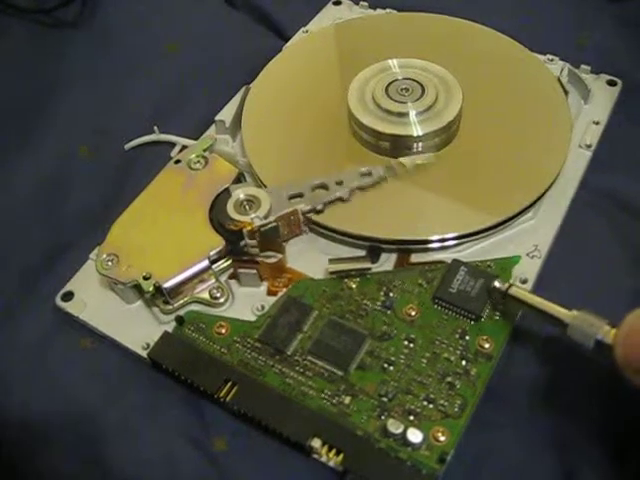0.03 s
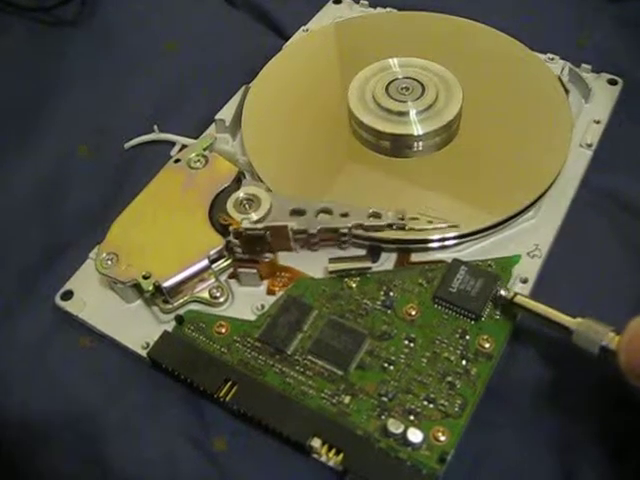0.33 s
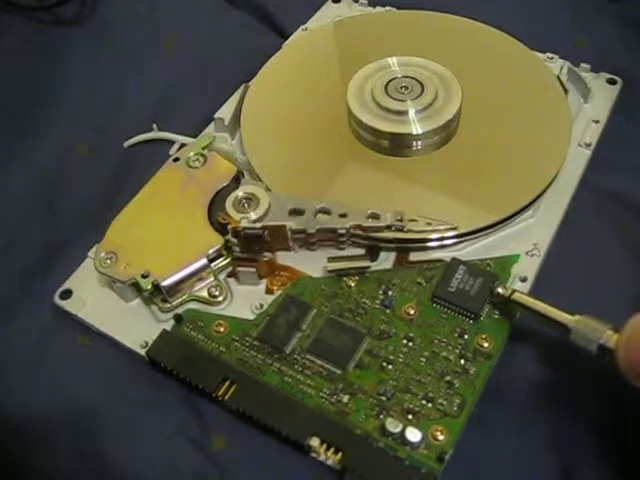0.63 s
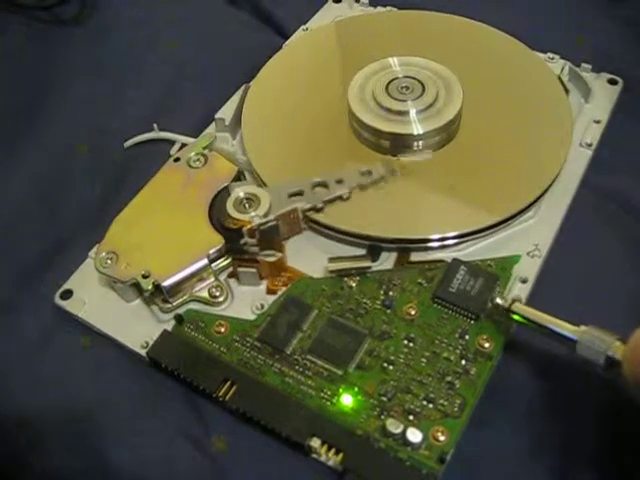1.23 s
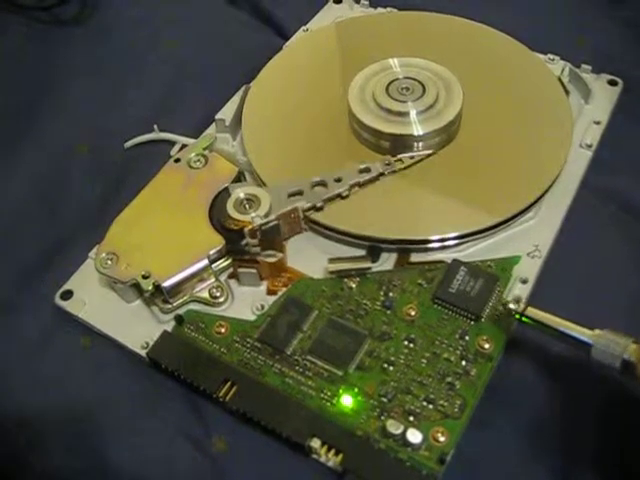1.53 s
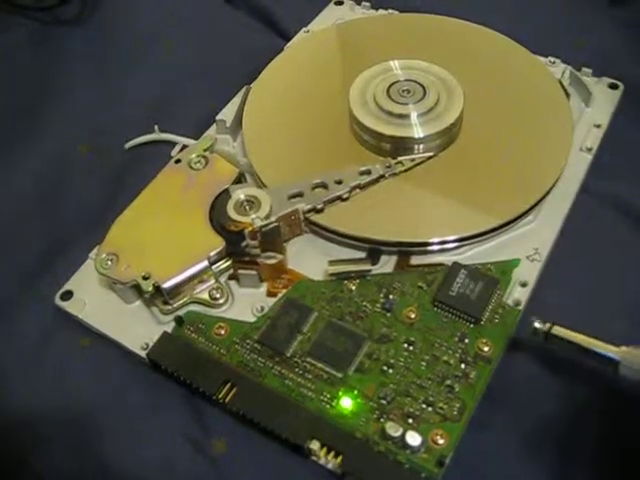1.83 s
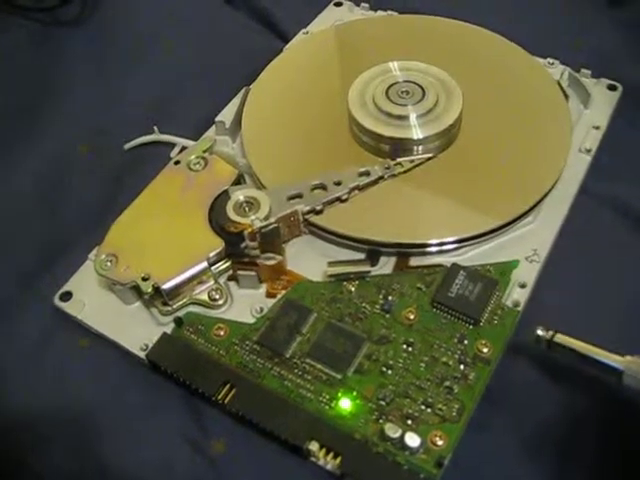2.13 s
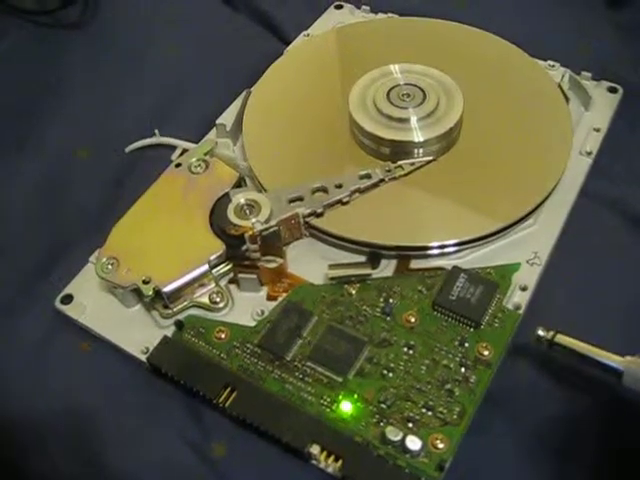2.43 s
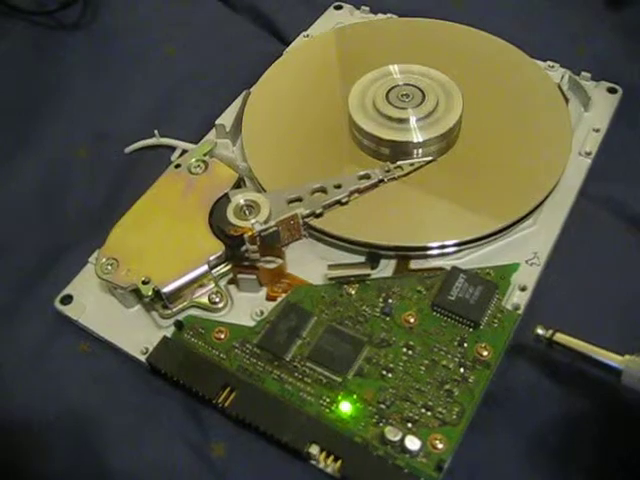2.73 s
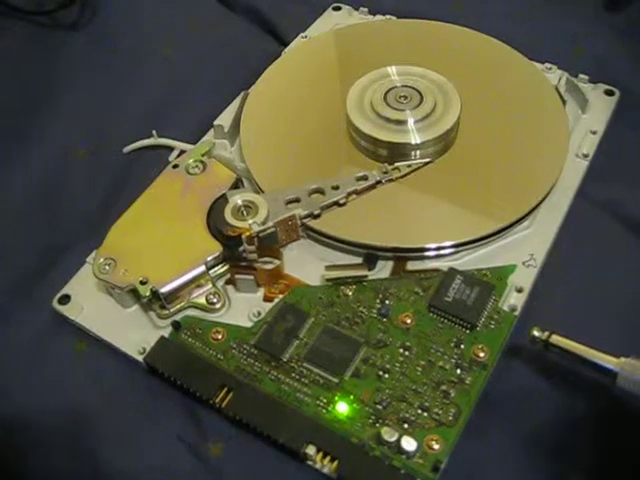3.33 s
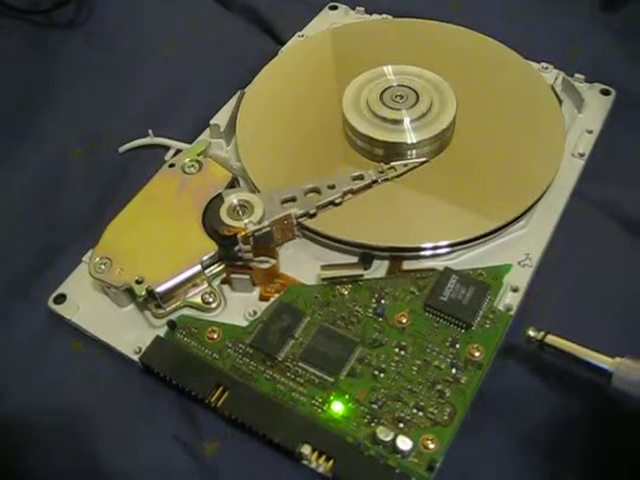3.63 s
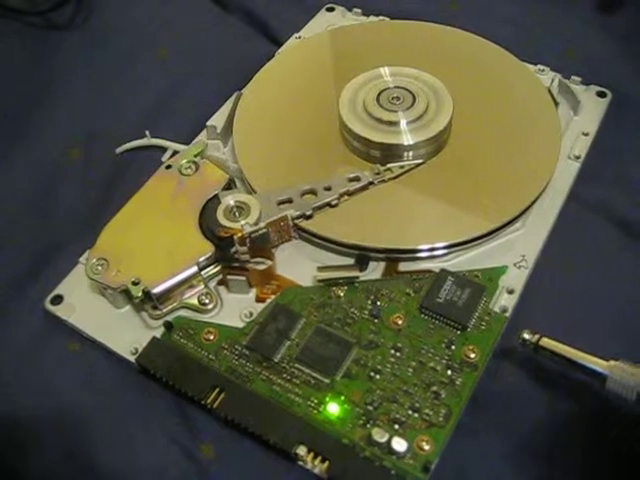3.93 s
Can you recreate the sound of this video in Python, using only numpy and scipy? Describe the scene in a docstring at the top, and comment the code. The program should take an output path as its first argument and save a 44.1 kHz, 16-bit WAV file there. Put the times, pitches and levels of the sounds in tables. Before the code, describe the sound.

An open hard drive, close by, clacks irregularly for the first 1.3 seconds as its arm hits the stops, with thin fizzing and faint squeals over hissing bearings. From about 1.25 seconds a high motor whine rises, cutting out near 2.5. It returns briefly around 2.9 seconds, then holds steady and much softer until 4. Low electrical hum and quiet room air continue underneath.

```python
"""An open hard drive on a cloth, close by, over mains hum and a quiet room. At first the platters coast
down on hissing ball bearings while the head arm clacks against its stops and the heads skim and squeal.
At about 1.25 s the motor pulls the platters back up to speed, its rising whine sweeping through the
resonances of the case. It cuts out near 2.5 s, gives one short extra push near 2.9 s, then holds the
speed with a much softer whine."""
import sys
import numpy as np
from scipy import signal
from scipy.fft import rfft, irfft, next_fast_len
from scipy.io import wavfile
from scipy.ndimage import uniform_filter1d, map_coordinates

SR = 44100
rng = np.random.default_rng(int(sys.argv[2]) if len(sys.argv) > 2 else 0)


def wav_record(signal):
    """Record a signal, one row per channel, as 16-bit PCM in the file named by sys.argv[1]."""
    frames = np.transpose(np.atleast_2d(signal))
    bounded = np.clip(frames, -1, 1)
    # unit amplitude maps onto the largest positive 16-bit level
    quanta = np.round(bounded * 32767).astype(np.int16)
    wavfile.write(sys.argv[1], SR, quanta)


N = 176400
TIME = np.arange(N) / SR
RUNNING_HZ, PULSES_PER_TURN = 358.2, 6  # motor pulses at running speed


def amp(db):
    """Decibels to gain."""
    return 10 ** (np.asarray(db) / 20)


def unit(x):
    """Scale to rms 1."""
    return x / np.sqrt(np.mean(x ** 2) + 1e-20)


def wobble(knots_per_s):
    """A smooth random curve."""
    knots = rng.standard_normal(int(N * knots_per_s / SR) + 4)
    return map_coordinates(knots, [TIME * knots_per_s])


def filtered(x, response):
    """Equalise x with a gain that is a function of frequency."""
    size = next_fast_len(N + 8192)
    return irfft(rfft(x, size) * response(np.fft.rfftfreq(size, 1 / SR)), size)[:N]


def noise(colour):
    """Noise of rms 1, coloured by (Hz, dB) points."""
    freqs, db = np.transpose(colour)
    response = lambda hz: amp(np.interp(np.log(hz + 1), np.log(freqs), db))
    return unit(filtered(rng.standard_normal(N), response))


def resonant(peaks, hz):
    """Gain of a set of steep-sided resonances at each frequency."""
    gains = (amp(db) / (1 + (2 * (hz - centre) / width) ** 2) for centre, width, db in peaks)
    return np.sqrt(sum(gain ** 2 for gain in gains))


def ringing_noise(peaks):
    """Noise of rms 1, heard through resonances."""
    return unit(filtered(rng.standard_normal(N), lambda hz: resonant(peaks, hz)))


def swells(rows):
    """An envelope of bell-shaped swells."""
    return sum(amp(db) * np.exp(-((TIME - peak) / half_width) ** 2) for peak, half_width, db in rows)


def add(track, start_s, sound):
    """Mix a sound into the track."""
    part = track[max(round(start_s * SR), 0):][:len(sound)]
    part += sound[:len(part)]


# The dark room tone. Each row: frequency in Hz, relative level in dB.
ROOM_COLOUR = [(20, 2), (45, 0.5), (100, -1), (250, -1.5), (500, -6.5), (1500, -4.5), (8000, -55)]
# Whistles that ignore the platter speed. Each row: pitch in Hz, level in dB.
WHISTLES = [(1766, -58), (2233, -53), (2287, -46), (2357, -49)]


def room(air_db=-54.5, hum_db=-60, hum_hz=120):
    """The bed: quiet indoor air, mains hum and a few faint steady whistles."""
    whistles = sum(amp(db + .42 * wobble(8)) * np.sin(2 * np.pi * hz * TIME + .73 * wobble(12))
                   for hz, db in WHISTLES)
    hum = amp(hum_db) * np.sin(2 * np.pi * hum_hz * TIME)
    return amp(air_db) * noise(ROOM_COLOUR) + np.sqrt(2) * (hum + whistles)


def room_echo(x, wet_db=-10, t60_s=.5):
    """The short answer of a small room."""
    t = np.arange(SR // 3) / SR
    tail = rng.standard_normal(len(t)) * amp(-60 * t / t60_s)
    return amp(wet_db) * signal.fftconvolve(x, tail / np.linalg.norm(tail))[:N]


# The bearings' singing at running speed. Each row: pitch in Hz, relative level in dB.
BEARING_TONES = [(2304, -41.5), (2428, -44), (2557, -45), (2939, -55), (3063, -48.5), (3316, -58),
                 (3784, -51.5)]
# The body's colour on hiss and tones. Each row: frequency in Hz, relative level in dB.
BEARING_COLOUR = [(300, -32.5), (1000, -22), (1900, -18), (2130, -15), (2290, 0), (2480, -6.5), (2800, -7),
                  (3200, -15.5), (3750, -10), (4300, -18), (5800, -19.5), (7000, -26.5), (9000, -26.5),
                  (10300, -20.5), (11700, -29.5), (12500, -33), (13600, -36), (15500, -38)]
# Narrow rings kept alive by the rolling. Each row: centre in Hz, width in Hz, relative level in dB.
BEARING_RINGS = [(517, 103, -4.5), (7040, 69, -1.5), (9540, 85, 2), (9830, 50, 3.5), (11540, 220, -3),
                 (12880, 90, -8), (13400, 120, -6)]


def bearings(pulse_hz, phase, tones_trim_db=-1.5, hiss_db=-33.5, rings_db=-50):
    """Rolling balls: wavering tones glide through the body's colour, and a hiss throbs once a turn."""
    speed = pulse_hz / RUNNING_HZ
    colour_db = lambda hz: np.interp(hz, *np.transpose(BEARING_COLOUR))
    tones = np.zeros(N)
    for hz, db in BEARING_TONES:
        level = amp(db + colour_db(hz * speed) - colour_db(hz) + 3 * wobble(14))
        tones += level * np.sin(hz / RUNNING_HZ * phase + .5 * wobble(12) + 2 * np.pi * rng.random())
    throb = amp(.5 * np.sin(phase / PULSES_PER_TURN) + .38 * wobble(90))
    rings = amp(rings_db) * ringing_noise(BEARING_RINGS)
    hiss = amp(hiss_db) * noise(BEARING_COLOUR) * speed ** 1.7
    return amp(tones_trim_db) * np.sqrt(2) * tones + throb * (hiss + rings)


# Brushes of fizz. Each row: peak time in seconds, half-width in seconds, level in dB.
SKIMS = [(.15, 0.017, -40), (.79, 0.022, -48), (.845, 0.04, -49), (.924, 0.0086, -39.5), (.95, 0.04, -44.5),
         (1.06, 0.03, -46)]
# The heads' thin ring. Each row: centre in Hz, width in Hz, relative level in dB.
HEAD_RESONANCES = [(9160, 170, -3), (10970, 130, 2), (11600, 700, -6), (12700, 200, -9), (14100, 200, -7)]


def head_skims():
    """The heads skim the platter and ring with a thin fizz."""
    return swells(SKIMS) * ringing_noise(HEAD_RESONANCES)


# Faint squeals. Each row: peak time in seconds, half-width in seconds, level in dB.
SQUEALS = [(.87, .07, -50), (1.05, 0.1, -51), (1.21, 0.045, -50)]


def head_squeals(pitch_hz=6200, octave_db=-5, stutter_db=4):
    """The heads give a stuttering squeal on the platter as the arm moves."""
    phase = 2 * np.pi * pitch_hz * TIME + wobble(110)
    tone = np.sin(phase) + amp(octave_db) * np.sin(2 * phase)
    stutter = amp(stutter_db * wobble(59.9))
    return swells(SQUEALS) * unit(stutter * tone)


# Short rubs. Each row: peak time in seconds, half-width in seconds, level in dB.
SCUFFS = [(.05, 0.059, -41), (.185, 0.038, -49), (.84, 0.011, -41)]
# Their dull colour. Each row: frequency in Hz, relative level in dB.
SCUFF_COLOUR = [(150, -27), (300, -8.5), (600, -9.5), (880, 3), (1200, -6.5), (2000, -18), (4000, -38)]


def arm_scuffs():
    """The arm scuffs along its stop."""
    return swells(SCUFFS) * noise(SCUFF_COLOUR)


# Swings of the arm. Each row: peak time in seconds, push level in dB, after-ring level in dB.
SWINGS = [(.575, -46, -47), (.84, -58, -48.5), (.966, -34, -48.5), (1.285, -43, -43.5)]


def arm_swings(pitch_hz=663, push_s=.013, t60_s=.53):
    """Each swing gives the base a brief push and leaves it humming."""
    envelope = np.zeros(N)
    for peak, push_db, ring_db in SWINGS:
        since = TIME - peak
        after_ring = np.clip(since / push_s, 0, 1) * amp(ring_db - 60 * np.abs(since) / t60_s)
        envelope += swells([(peak, push_s, push_db)]) + after_ring
    return envelope * np.sin(2 * np.pi * pitch_hz * TIME)


def struck(modes, t, tilt_db=0):
    """Decaying modes, different on every blow; a harder contact tilts them up by tilt_db an octave."""
    sound = np.zeros(len(t))
    for hz, db, t60 in modes:
        strike_db = db + tilt_db * np.log2(hz / modes[0][0]) + rng.normal(0, 1)
        sound += amp(strike_db - 60 * t / t60) * np.sin(2 * np.pi * (hz * t + rng.random()))
    return sound


# Hits on the stops. Each row: start in seconds, relative arm level in dB, hardness in dB per octave,
# relative thud level in dB, relative tick level in dB.
CLACKS = [(0.0135, -10.5, -7.5, -32, -15.5), (.0185, -14.5, -1.5, -35, -34), (0.071, -28, 2, -38, -25.5),
          (0.178, -16, -2, -33.5, -28), (0.185, -20, -4, -32.5, -23), (0.2489, -23, 9.5, -37, -12.5),
          (.332, -23, -3, -33, -38), (.565, -11.5, 3.5, -31, -31), (0.733, -27.5, 5, -39.5, -28),
          (0.7596, -14.5, 4, -38.5, -13), (.807, -27, 10, -36, -24), (0.8103, -21, 7, -42, -18),
          (.839, -19.5, -4, -36.5, -31), (1.26, -24, -1, -32.5, -42)]
# The arm's bright ring. Each row: pitch in Hz, relative level in dB, seconds to fade by 60 dB.
ARM_MODES = [(2290, -5.5, 0.018), (2598, 1.5, 0.022), (3250, -13.5, 0.031), (3765, -9, .025),
             (4550, -12, 0.012), (5090, -9.5, 0.015), (5610, -13.5, 0.018), (6290, -14.5, 0.016)]
# The base plate's low thud. Each row: pitch in Hz, relative level in dB, seconds to fade by 60 dB.
PLATE_MODES = [(554, -6, 0.091), (673, -12.5, 0.13), (944, -5, 0.065), (1266, -2, 0.028), (1406, -10, 0.11),
               (1630, -1.5, 0.041)]
# The metallic attack. Each row: frequency in Hz, relative level in dB.
TICK_COLOUR = [(1500, -14), (3000, 1), (6000, 2), (7200, -5), (10400, -1), (11700, 8), (12400, -10),
               (15500, -16)]


def arm_clacks(arm_trim_db=3, tick_trim_db=-2, tick_t60_s=.012, contact_s=.00012, body_rise_s=.0014):
    """Each hit on a stop starts with a metallic tick, rings the arm and thuds the base plate."""
    track = np.zeros(N)
    t = np.arange(SR // 3) / SR
    tick_attack = 1 - np.exp(-t / contact_s)
    body_attack = 1 - np.exp(-t / body_rise_s)
    for start, arm_db, hardness, thud_db, tick_db in CLACKS:
        tick = noise(TICK_COLOUR)[:len(t)] * amp(tick_trim_db + tick_db - 60 * t / tick_t60_s)
        ring = amp(arm_trim_db + arm_db) * struck(ARM_MODES, t, hardness)
        thud = amp(thud_db) * struck(PLATE_MODES, t)
        add(track, start, tick * tick_attack + (ring + thud) * body_attack)
    return track


# Bursts of motor power. Each row: start in seconds, start of the release in seconds,
# rise in seconds, release in seconds, relative level in dB.
PUSHES = [(1.245, 2.375, .06, .15, .5), (2.872, 3.033, .105, .022, -1.5)]


def motor_current(phase, least_duty=.15, smooth_s=.007):
    """The regulator switches the current on for a share of each turn, all of it at the height of a push."""
    turn = phase / (2 * np.pi * PULSES_PER_TURN) % 1
    current = np.zeros(N)
    for on, off, rise, release, db in PUSHES:
        demand = np.minimum((TIME - on) / rise, 1 - (TIME - off) / release)
        duty = (demand > 0) * (least_duty + (1 - least_duty) * demand)
        current += amp(db) * (turn < duty)
    return uniform_filter1d(current, int(smooth_s * SR))


# The whine's partials. Each row: multiple of the pulse rate, relative level in dB.
WHINE_HARMONICS = [(6, -41), (12, -33.5), (13, -37.5), (14, -32), (15, -46.5), (16, -43), (18, -41.5),
                   (19, -45), (20, -36), (22, -44), (24, -31), (25, -40), (28, -39), (29, -38), (30, -31),
                   (31, -39.5), (32, -40), (33, -48), (34, -44.5), (36, -46), (40, -46), (41, -48)]
# The case resonances they sweep through. Each row: centre in Hz, width in Hz, gain in dB.
CASE_RESONANCES = [(2000, 340, -13), (3912, 75, 0), (4540, 150, -9), (4715, 50, -5), (4810, 130, -3),
                   (4965, 190, 1), (5700, 300, -6), (6380, 220, -9.5), (6930, 1200, -15), (8830, 280, -11),
                   (9530, 130, -3.5), (9942, 70, 1.5), (10940, 80, -2), (11132, 65, 7.5), (11455, 100, 7),
                   (11400, 1100, -10), (12860, 200, -8), (14000, 1000, -15)]


def motor_whine(pulse_hz, phase, trim_db=.5, hold_db=-19.5, waver_db=1.8, jitter_rad=.018):
    """Harmonics of the motor pulses flare as they cross the case resonances; jitter blurs the high ones."""
    current = motor_current(phase)
    hold = amp(hold_db) * (TIME > PUSHES[-1][1])  # keeps the speed after the last push
    grid_hz = np.arange(SR // 2)
    case_gain = resonant(CASE_RESONANCES, grid_hz)
    whine = np.zeros(N)
    for order, db in WHINE_HARMONICS:
        # The smooth holding current drives only the lower harmonics.
        drive = np.maximum(current, hold) if order <= 20 else current
        level = amp(db + waver_db * wobble(24.86)) * np.interp(order * pulse_hz, grid_hz, case_gain)
        jittered = phase + jitter_rad * wobble(170)
        whine += drive * level * np.sin(order * jittered + 2 * np.pi * rng.random())
    return amp(trim_db) * np.sqrt(2) * whine


# The spindle sags, climbs and settles. Each row: time in seconds, motor pulse rate in Hz.
SPINDLE_SPEED = [(0, 358), (.8, 354), (1.26, 315.2), (1.61, 331), (1.93, 344.4), (2.17, 353.5),
                 (2.37, 360.6), (2.48, 363), (2.9, 356), (3.06, 358.2), (4, 358.2)]


def scene():
    """One spindle speed drives the whine and the bearings; only the clacks and swings get an echo."""
    pulse_hz = np.interp(TIME, *np.transpose(SPINDLE_SPEED))
    phase = 2 * np.pi * np.cumsum(pulse_hz) / SR
    arm = arm_clacks() + arm_swings()
    spindle = motor_whine(pulse_hz, phase) + bearings(pulse_hz, phase)
    friction = head_skims() + head_squeals() + arm_scuffs()
    return (spindle + friction + arm + room_echo(arm) + room())[None]


def record(dry):
    """The final EQ: a deep notch in the treble and nothing above the top frequency."""
    notch_hz, half_width_hz, top_hz = 7875, 900, 15780
    notch = lambda hz: np.abs(hz - notch_hz) / np.hypot(hz - notch_hz, half_width_hz)
    return filtered(dry[0], lambda hz: notch(hz) * (hz < top_hz))[None]


dry = scene()
out = record(dry)
wav_record(out)
```